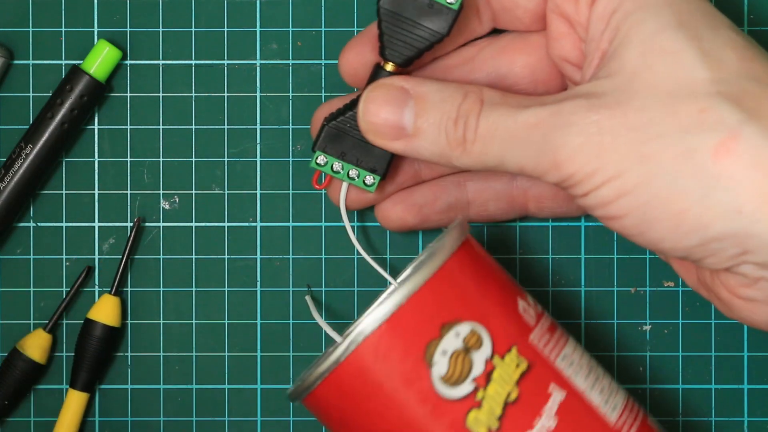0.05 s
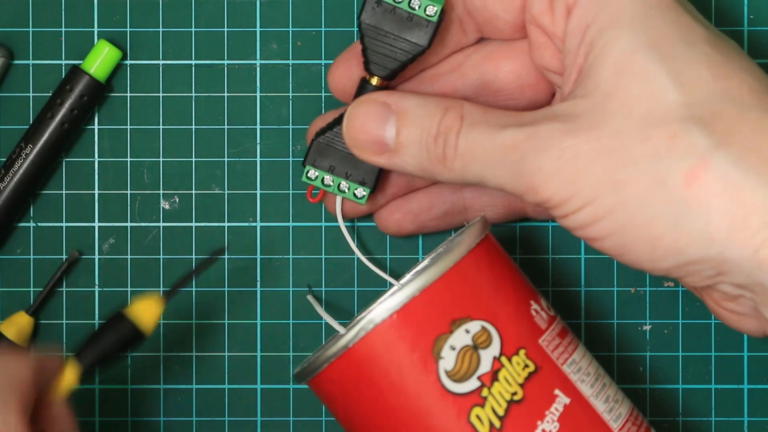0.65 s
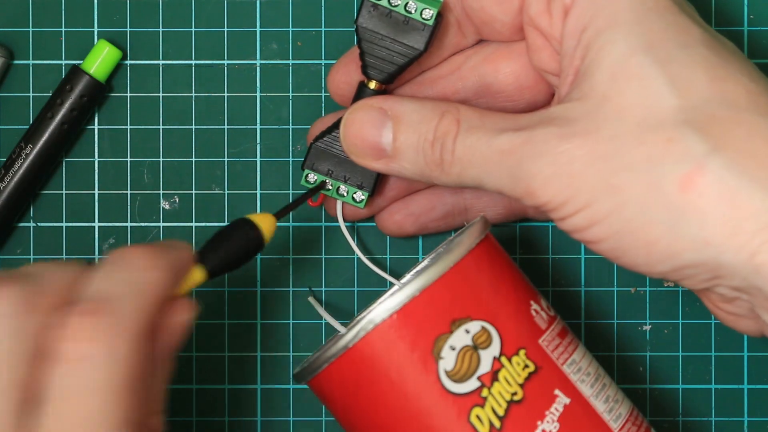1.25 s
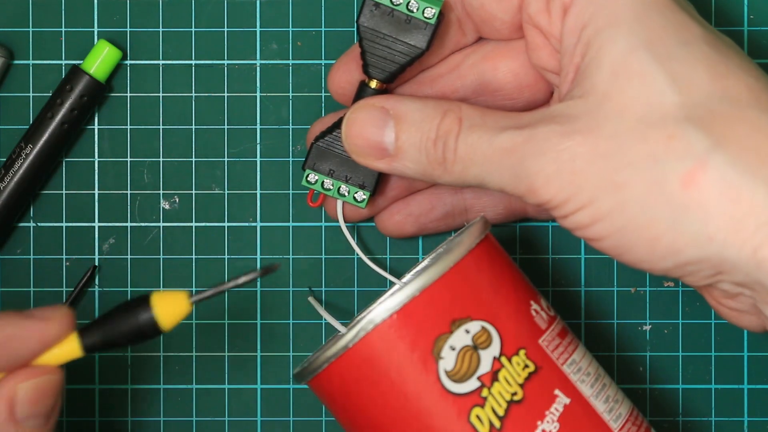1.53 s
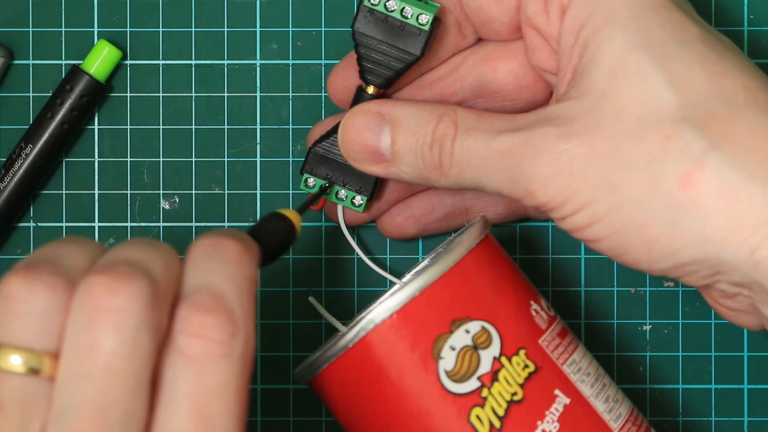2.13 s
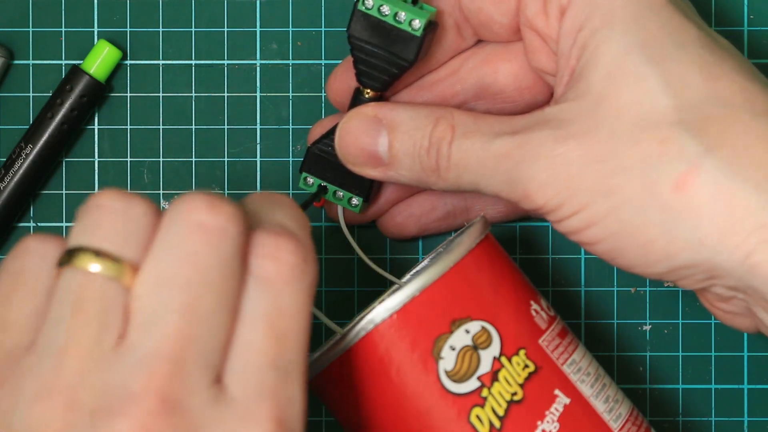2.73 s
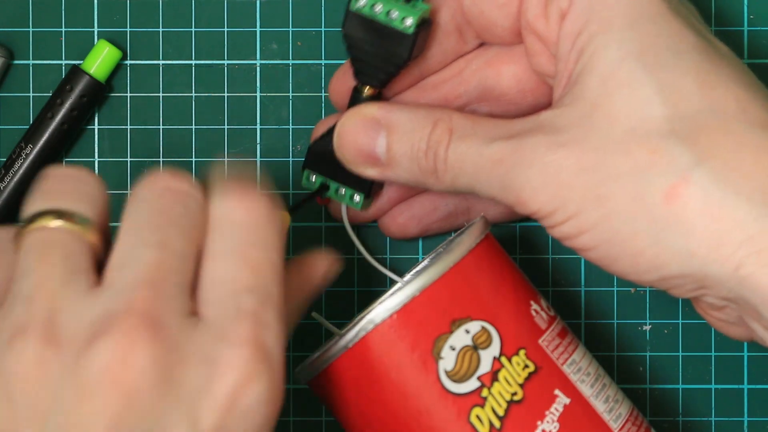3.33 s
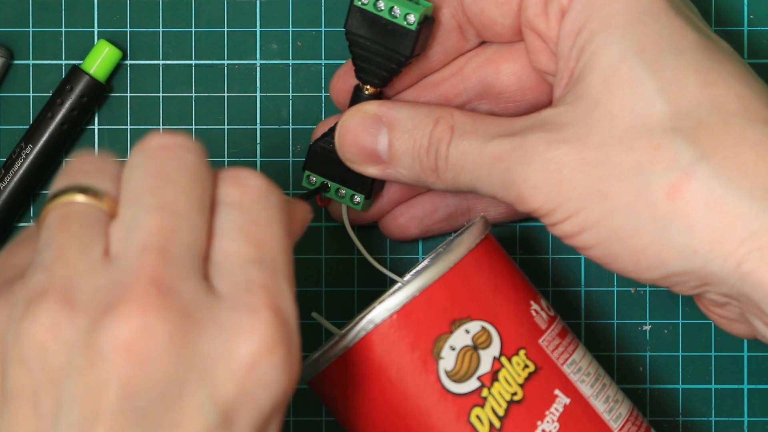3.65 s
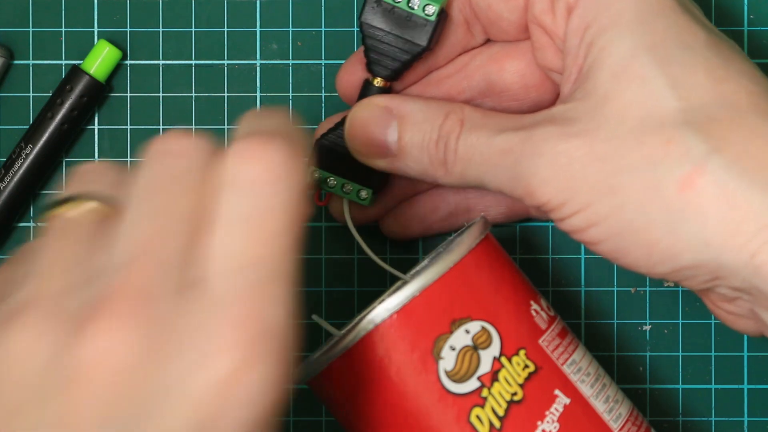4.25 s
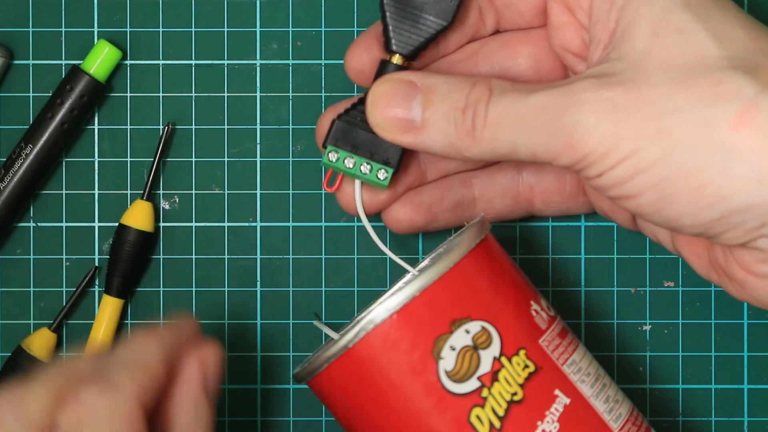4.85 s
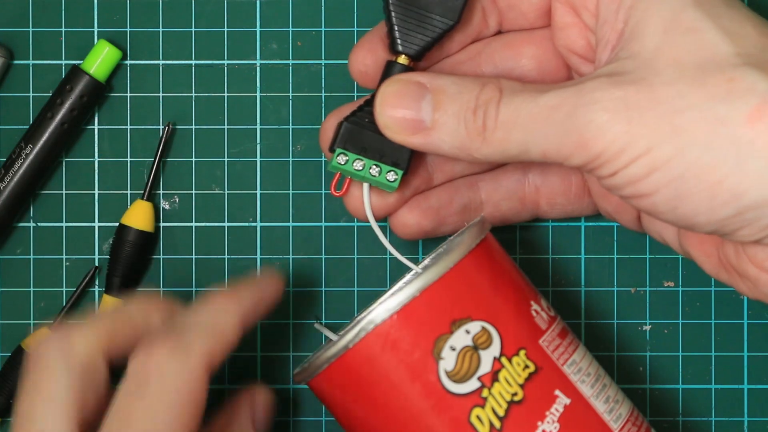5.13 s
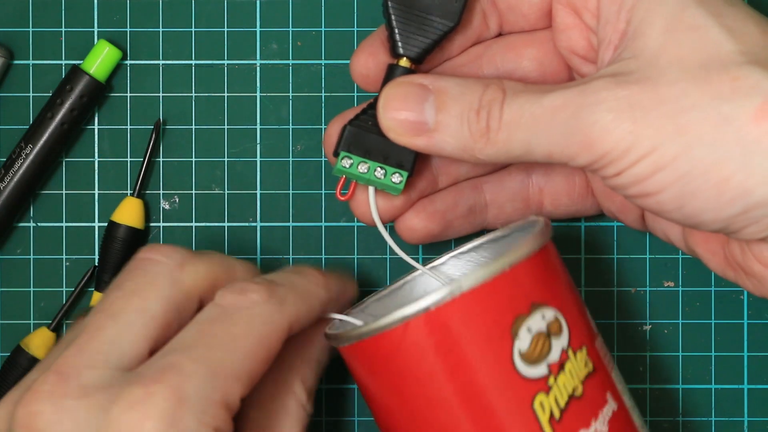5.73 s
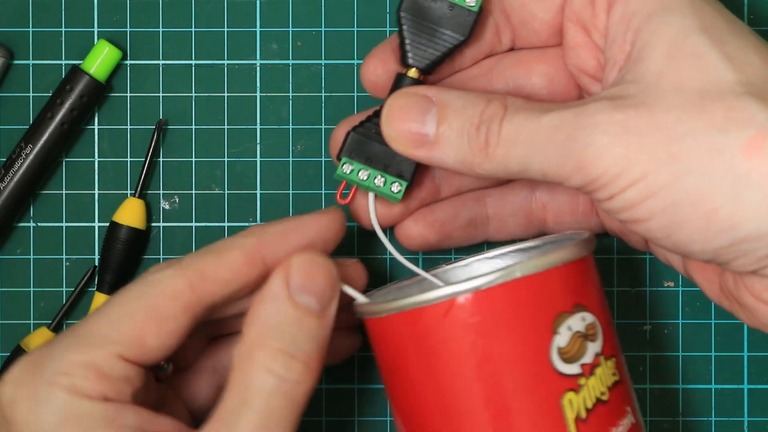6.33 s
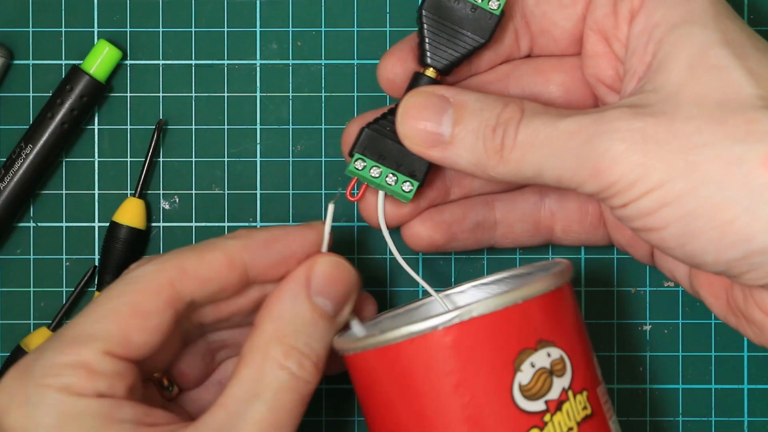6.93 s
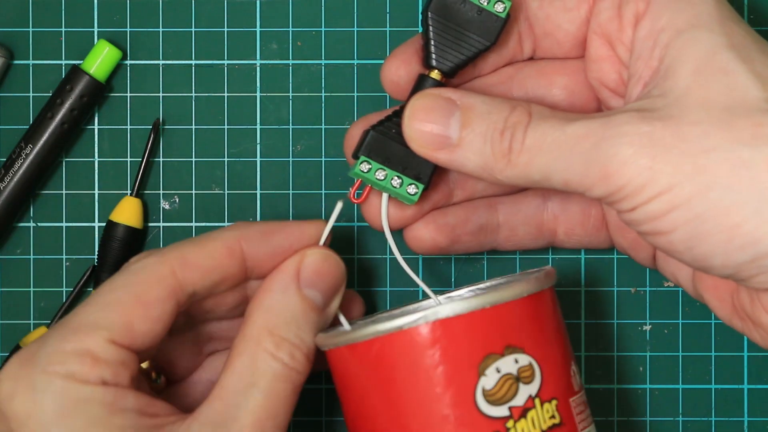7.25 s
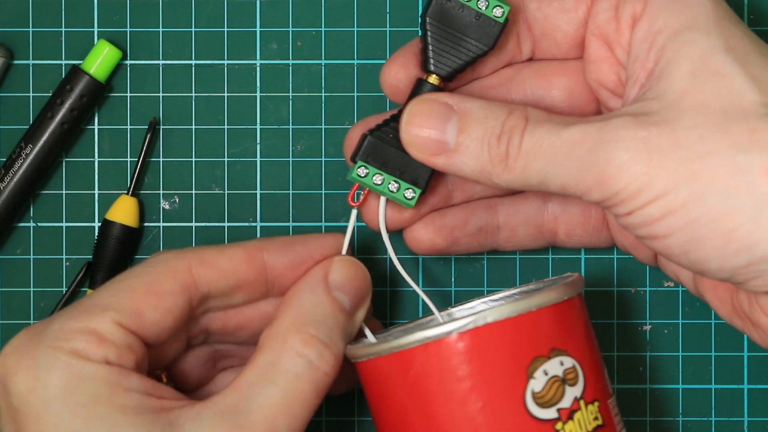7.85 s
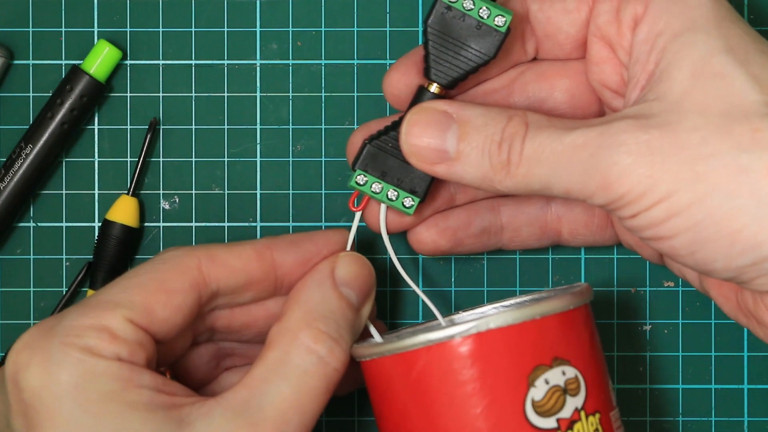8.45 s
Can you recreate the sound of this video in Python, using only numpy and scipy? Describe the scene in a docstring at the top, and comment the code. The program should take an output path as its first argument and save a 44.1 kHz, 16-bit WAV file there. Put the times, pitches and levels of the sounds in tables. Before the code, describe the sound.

A small screwdriver ticks in a connector and clatters down, then a hollow cardboard can is handled, a wire clicking on its metal rim.

```python
"""Screwdriver and cardboard can

Close up in a small quiet room, a precision screwdriver ticks in the screw terminal of a plastic
connector, then clacks and thuds onto the cutting mat. An empty cardboard can with a metal rim, brushed
at the start, is now turned in the fingers as a thin wire is pulled out: it booms hollowly, rubs and
squeaks on the mat, and the wire clicks on the rim. Impacts and friction drive damped resonances."""
import sys
import numpy as np
from scipy import signal
from scipy.fft import rfft, irfft
from scipy.io import wavfile
from scipy.ndimage import uniform_filter1d

SR = 44100
rng = np.random.default_rng(int(sys.argv[2]) if len(sys.argv) > 2 else 0)


def inscribe(sig):
    """Save sig as 16-bit PCM at rate SR to the path in sys.argv[1].

    A 1-D sig is mono; a 2-D sig holds one channel per row.
    Samples are clipped to [-1, 1] before scaling.
    """
    pcm = np.round(np.clip(np.atleast_2d(sig).T, -1, 1) * 32767)
    wavfile.write(sys.argv[1], SR, pcm.astype(np.int16))


N = 383669
TIME = np.arange(N) / SR

# Levels in the tables are relative; an offset_db adds to the level_db of its row.
# background noise spectrum: frequency_hz, density_db
HISS_SPECTRUM = [(25, -8), (45, -16), (120, -18.5), (300, -22), (750, -24.5), (2650, -28.5), (15800, -30.5)]
# stereo width of that noise: frequency_hz, side_minus_mid_db
HISS_WIDTH = [(30, -5.5), (90, -4.5), (1300, -3.5), (8000, .5)]
# the can slides under the fingers: start_s, length_s, level_db, rumble_offset_db
CAN_SLIDES = [(0, 0.18, -60, 4), (0.189, 0.21, -63.5, 1), (0.457, 0.037, -58.5, -6), (3.3, 0.068, -61, -3),
              (5.37, 0.095, -50.5, 1.5), (5.567, .1, -45.5, -4), (5.684, .11, -58, 0),
              (5.897, .16, -55, 2.5), (6.09, 0.055, -47.5, -4), (6.213, 0.19, -49.5, -4),
              (6.585, 0.054, -54.5, -1), (6.721, 0.19, -60.5, -4.5), (7.08, 0.53, -59.5, -5.5),
              (7.624, 0.59, -69.5, 1)]
# metal scrapes along an edge: start_s, length_s, level_db
EDGE_SCRAPES = [(0, 0.041, -58.5), (0.657, .06, -65), (0.767, .025, -58.5), (3.303, 0.031, -63),
                (5.327, 0.083, -58), (5.593, .22, -48), (5.649, 0.034, -41), (5.984, 0.3, -53),
                (6.406, 0.079, -53.5), (6.49, 0.15, -61.5), (6.85, 0.04, -52)]
# the wire snaps over the metal edge: start_s, level_db, rim_offset_db
WIRE_SNAPS = [(0.004, -46, -4), (0.137, -49.5, -2), (5.348, -38.5, -3), (5.69, -27, -5),
              (5.8785, -14.5, -5.5), (5.9597, -33, 2), (5.979, -36, -15), (6.0219, -35.5, -4),
              (6.1313, -27.5, -6), (6.393, -21.5, -10), (6.464, -33.5, -8), (6.8568, -43, -9.5),
              (6.896, -30.5, -19), (7.584, -50, 1), (8.146, -52, -14)]
# fingertips land on the can: start_s, level_db, boom_offset_db
CAN_TAPS = [(0.097, -48.5, 9), (0.147, -39.5, 0.5), (0.313, -47.5, -10), (5.2913, -35, -4),
            (5.362, -44, -4), (5.4207, -35.5, -11), (5.438, -40.5, 9), (5.463, -42, 8), (5.585, -30.5, 0.5),
            (5.758, -37.5, -5.5), (5.907, -38, 2.5), (5.962, -41, 9), (6.088, -42, 2), (6.228, -42.5, -3),
            (6.247, -42, 7.5), (6.312, -39, -1), (6.464, -41, -9), (6.582, -41, -8), (6.636, -42, 4.5),
            (7.001, -46.5, -8), (7.171, -49, 7), (7.273, -45, 0), (7.381, -46.5, -1), (7.746, -47.5, -3),
            (7.783, -50, -7), (7.985, -50, -3), (8.145, -53, 2), (8.313, -59, 13)]
# modes of the can's metal edge: frequency_hz, width_hz, level_db
EDGE_MODES = [(3910, 81, -13.5), (4300, 46, 1.5), (4690, 150, 2.5), (5270, 320, -1), (6130, 280, -13),
              (6940, 320, -10.5), (7730, 730, -11), (8880, 250, -10), (9870, 280, -7.5),
              (11000, 1000, -12.5)]
# modes of its rim: frequency_hz, width_hz, level_db
RIM_MODES = [(2278, 58, 12), (2460, 81, 6), (3000, 130, -20)]
# modes of its cardboard wall: frequency_hz, width_hz, level_db
WALL_MODES = [(1324, 42, 4.5), (1417, 230, 2), (1566, 64, -4), (1730, 130, -5)]
# modes of its air, closed at one end (some near odd multiples): frequency_hz, width_hz, level_db
AIR_MODES = [(99.3, 12, -4), (140.5, 18, 3), (367, 150, -14.5), (433.8, 8.8, 7), (631, 44, -5),
             (755, 14, -8.5), (1050, 180, -18)]
# soft knocks and the can's low hollow booms: start_s, level_db, pitch_hz, width_hz
SOFT_BUMPS = [(0.003, -39.5, 148, 23.6), (0.262, -37, 106, 76), (0.265, -41, 590, 250),
              (2.961, -55, 300, 404), (3.016, -55, 200, 200), (3.114, -43.5, 107, 45),
              (3.116, -50.5, 1800, 250), (3.235, -53, 200, 216), (5.643, -43, 129, 41.67),
              (5.767, -38, 141, 21.9), (6.25, -38.5, 140, 27.78), (6.321, -39, 136, 32.41),
              (6.593, -41, 108, 37)]
# squeaks, groans and a thin ping: middle_s, half_length_s, pitch_hz, glide_per_half_octaves, level_db
SHORT_TONES = [(0.08, 0.087, 1290, 0.42, -58.5), (0.337, 0.007, 5080, -0.013, -44),
               (0.687, 0.061, 4190, -0.069, -62), (0.962, 0.078, 263.7, 0.027, -61),
               (5.347, .014, 642, -0.14, -51), (5.424, 0.017, 4570, 0.13, -43),
               (5.567, 0.02, 630, 0.082, -48.5), (5.652, .02, 1677, -0.023, -34.5),
               (5.668, .018, 1670, 0, -32), (5.684, 0.033, 1680, -0.13, -41)]
# the blade slips in the terminal: start_s, level_db, pitch_hz, housing_offset_db
BLADE_SLIPS = [(0.7831, -49, 7270, -1), (2.0084, -50, 6840, 7), (2.265, -64, 4000, 14.5),
               (2.4758, -52, 12000, 8), (2.599, -56, 8950, -1), (2.685, -44, 10550, -18),
               (2.812, -35.5, 8860, -28), (3.1164, -57.5, 5040, 6), (3.321, -52, 4270, -4),
               (3.4532, -46.5, 10400, -4.5), (4.044, -46.5, 5670, -3.5), (4.045, -48.5, 9000, -20),
               (4.363, -59.5, 4240, 10.5)]
# response of the plastic housing: frequency_hz, density_db
HOUSING_SPECTRUM = [(500, -42), (1200, 7), (1900, 9), (3000, 8.5), (7000, 0.5), (12000, -5), (16000, -10)]
# modes of the steel shaft: frequency_hz, width_hz, level_db
SHAFT_MODES = [(3130, 22, -9), (3970, 45, -4.5), (5660, 56, -4.5), (7400, 50, 0), (9200, 49, 5),
               (10450, 43, -0.5), (11500, 62, -2)]
# the screwdriver lands, tip first, then handle: start_s, clack_db, thud_db
TOOL_LANDINGS = [(4.5841, -35.5, -43), (4.5868, -15, -46.5), (4.588, -16, -25), (4.669, -35, -49),
                 (4.711, -42.5, -60.5), (4.724, -41.5, -55), (4.741, -41.5, -26.5), (4.7438, -25.5, -12),
                 (4.7549, -9, -20.5), (4.7573, -15.5, -15), (4.7665, -29.5, -19.5), (4.787, -37, -20.5),
                 (4.795, -27, -45)]
# hard clack of the shaft: frequency_hz, density_db
CLACK_SPECTRUM = [(100, -18.5), (230, -11.5), (320, -14.5), (420, -7.5), (650, -3), (1000, -17), (1800, 2),
                  (2400, -4.5), (2700, -5), (3100, 6), (3430, -16.5), (3750, 3), (5500, -6.5), (9300, -5.5),
                  (11500, -10), (12500, -18.5), (15500, -22)]
# dull thud of the handle: frequency_hz, density_db
THUD_SPECTRUM = [(90, -29.5), (300, -33.5), (520, -23.5), (690, -0.5), (850, -10), (1250, -4), (1900, -7.5),
                 (2400, -5.5), (3000, -35.5), (6000, -26.5), (15000, -57.5)]
# modes of the handle: frequency_hz, width_hz, level_db
HANDLE_MODES = [(669.5, 19, 0.5), (1080, 18, 2), (1230, 20, -3), (1340, 20, -3), (1415, 24, -3.5),
                (1585, 26, -4), (1745, 26, -5.5), (2413, 24, 5)]
# reverberation time: frequency_hz, t60_s
ROOM_DECAY = [(100, 0.44), (500, 0.28), (1500, 0.29), (4000, 0.33), (9000, 0.38), (15000, .22)]
# reverberation against the direct sound: frequency_hz, level_db
ROOM_GAIN = [(100, -1), (500, -2.5), (1500, -6), (4000, -5.5), (9000, -7.5), (15000, -7.5)]

HISS_DB, CUTOFF_HZ = -64, 15900


def from_db(db):
    """Amplitude grows tenfold every 20 decibels."""
    return 10 ** (np.asarray(db) / 20)


def at_hz(points, hz):
    """Interpolation on a log-frequency axis."""
    frequencies, values = np.transpose(points)
    return np.interp(np.log(np.maximum(hz, 1)), np.log(frequencies), values)


def unit_energy(x):
    """Normalisation: a response of unit energy preserves the power of white noise."""
    return x / np.sqrt(np.sum(x ** 2) + 1e-20)


def through(x, response):
    """A linear system convolves its input with its impulse response."""
    return signal.oaconvolve(x, response)[:N]


def butterworth(x, order, hz, kind="band"):
    """Filtering with a maximally flat passband."""
    return signal.sosfilt(signal.butter(order, hz, kind, fs=SR, output="sos"), x)


def add(out, start_s, sound):
    """Superposition: a short sound adds to what is already there."""
    start = max(0, int(start_s * SR))
    out[start:start + len(sound)] += sound[:max(0, N - start)]


def modes(rows):
    """Modal ringing: the wider a resonance, the faster its sinusoid decays."""
    t = TIME[:8192]
    return unit_energy(sum(from_db(db) * width * np.exp(-np.pi * width * t) * np.cos(2 * np.pi * hz * t)
                           for hz, width, db in rows))


def damped_body(spectrum, size=2048):
    """Minimum phase: a magnitude spectrum determines a compact causal response."""
    magnitude = from_db(at_hz(spectrum, np.fft.rfftfreq(size, 1 / SR)))
    cepstrum = irfft(np.log(magnitude))
    causal = np.r_[cepstrum[0], 2 * cepstrum[1:size // 2]]
    return unit_energy(irfft(np.exp(rfft(causal, size))))


def contact(length_s):
    """Broadband excitation: milliseconds of micro-impacts and bench reflections."""
    t = TIME[:2048] / length_s
    envelope = np.exp(-t ** 2) * (1 - np.exp(-t / 0.22))
    burst = rng.standard_normal(len(t)) * envelope
    for _ in range(8):   # flatten the spectrum, then confine the burst again
        burst = irfft(np.exp(1j * np.angle(rfft(burst)))) * np.sqrt(envelope)
    return unit_energy(burst)


def blows(starts_s, levels_db, length_s):
    """Contact forces superpose; they share one length or have one each."""
    force = np.zeros(N)
    for start_s, db, contact_s in np.broadcast(starts_s, levels_db, length_s):
        add(force, start_s, from_db(db) * contact(contact_s))
    return force


def hiss():
    """Stationary noise: a steady background of air and hiss, as mid and side."""
    hz = np.fft.rfftfreq(N, 1 / SR)
    colour = from_db(at_hz(HISS_SPECTRUM, hz))
    colour = colour * from_db(HISS_DB) / np.sqrt(np.mean(colour ** 2 * (hz < CUTOFF_HZ)))
    mid, side = rfft(rng.standard_normal((2, N))) * colour
    return irfft(mid, N), irfft(side * from_db(at_hz(HISS_WIDTH, hz)), N)


def friction(slips_per_s, spread_db, clump_db):
    """Friction as shot noise: random slips of uneven size, clumped by a varying grip; rms 1."""
    sizes = from_db(spread_db * np.minimum(rng.exponential(1, N), 4)) * rng.choice([-1, 1], N)
    grip = np.interp(TIME, np.linspace(0, TIME[-1], 600), rng.standard_normal(600))
    slipping = rng.random(N) < slips_per_s / SR
    return unit_energy(sizes * from_db(clump_db * grip) * slipping) * np.sqrt(N)


def strokes(starts_s, lengths_s, levels_db, attack_s=0.02, release_db_per_s=330):
    """Rubbing pressure rises linearly, holds and decays exponentially."""
    pressure = np.zeros(N)
    for start_s, length_s, db in zip(starts_s, lengths_s, levels_db):
        t = TIME[:int(length_s * SR) + SR // 2]
        fall_db = release_db_per_s * np.maximum(t - length_s, 0)
        add(pressure, start_s, np.minimum(t / attack_s, 1) * from_db(db - fall_db))
    return pressure


def rubbing_forces():
    """Sliding friction: slides rustle and rumble in the can, scrapes crackle on edge and rim."""
    start_s, length_s, db, rumble_offset_db = np.transpose(CAN_SLIDES)
    rustle = strokes(start_s, length_s, db) * friction(slips_per_s=1400, spread_db=-0.5, clump_db=4.5)
    rumble = strokes(start_s, length_s, db + rumble_offset_db)
    rumble *= friction(slips_per_s=1000, spread_db=2.5, clump_db=1.5)
    scrape = strokes(*np.transpose(EDGE_SCRAPES)) * friction(slips_per_s=1400, spread_db=0.5, clump_db=4)
    edge = from_db(-4) * scrape + from_db(-16) * rustle
    rim = from_db(-13) * scrape + from_db(-15) * rustle
    wall, air = from_db(-7.5) * rustle, from_db(-5) * rumble
    return np.array([edge, rim, wall, air])


def wire_forces(gain_db=14, skid_s=0.0061, skid_db=-16):
    """Impulsive excitation: the wire skids and snaps over the edge; the rim couples to wall and air."""
    start_s, db, rim_offset_db = np.transpose(WIRE_SNAPS)
    snap = blows(start_s, db + gain_db, length_s=0.006)
    skid = blows(start_s - skid_s, db + gain_db + skid_db, length_s=2 * skid_s)
    rim = blows(start_s, db + gain_db + rim_offset_db, length_s=0.0043)
    wall, air = from_db(-13) * rim, from_db(-22) * rim
    return np.array([snap + skid, rim, wall, air])


def tap_forces(gain_db=14, boom_gain_db=13, firm_db=-34.5, firm_s=0.0055, drag_s_per_db=0.18):
    """Soft impact: a firm fingertip is brief and excites the metal, a light one is dull and drags."""
    start_s, db, boom_offset_db = np.transpose(CAN_TAPS)
    lightness_db = np.maximum(firm_db - db, 0)
    contact_s = np.minimum(firm_s + drag_s_per_db * lightness_db, 0.017)
    start_s = start_s - 0.299 * (contact_s - firm_s)   # a soft fingertip starts to press sooner
    metal = blows(start_s, db + gain_db - 0.85 * lightness_db, contact_s)
    edge, rim = from_db(-10.5) * metal, from_db(-3) * metal
    wall = blows(start_s, db + gain_db, contact_s)
    air = blows(start_s, db + boom_offset_db + boom_gain_db, contact_s)
    return np.array([edge, rim, wall, air])


def can():
    """Forced vibration: wire, taps and rubbing drive the same edge, rim, wall and air column."""
    on_edge, on_rim, on_wall, on_air = wire_forces() + tap_forces() + rubbing_forces()
    edge = through(on_edge, modes(EDGE_MODES))
    shell = through(on_rim, modes(RIM_MODES)) + through(on_wall, modes(WALL_MODES))
    hollow = through(on_air, modes(AIR_MODES))
    # small parts radiate no bass; soft fingers put little treble into the large ones
    return (butterworth(edge, 2, [1800, 11500]) + butterworth(shell, 1, [700, 4500])
            + butterworth(hollow, 2, [70, 1300]))


def soft_bumps(gain_db=14):
    """Damped oscillation: soft knocks and the can's low hollow booms, each one decaying note."""
    out = np.zeros(N)
    for start_s, db, hz, width_hz in SOFT_BUMPS:
        note = signal.fftconvolve(contact(length_s=0.0022), modes([(hz, width_hz, 0)]))
        softened = butterworth(note, 1, [hz / 2, hz * 2])
        add(out, start_s, from_db(db + gain_db) * unit_energy(softened))
    return out


def short_tones(jitter=0.035, overtone_db=-24, gain_db=2):
    """Frequency modulation: wavering squeaks and groans of can and fingers, and a thin screw ping."""
    out = np.zeros(N)
    for middle_s, half_s, hz, glide_octaves, db in SHORT_TONES:
        n = int(2 * half_s * SR)
        waver = uniform_filter1d(rng.standard_normal(N // 20), size=40)[:n]
        pitch_hz = hz * 2 ** (glide_octaves * np.linspace(-1, 1, n)) * (1 + jitter * waver / waver.std())
        phase = 2 * np.pi * np.cumsum(pitch_hz) / SR
        tone = np.sin(phase) + from_db(overtone_db) * np.sin(2 * phase)
        add(out, middle_s - half_s, from_db(db + gain_db) * np.hanning(n) ** 4 * tone)
    return out


def screw_terminal(ping_gain_db=12, housing_gain_db=13, band_ratio=7 / 6, ring_width_hz=110):
    """Resonance: each slip of the blade pings the metal, rings the shaft and clicks the plastic."""
    out, housing, shaft = np.zeros(N), damped_body(HOUSING_SPECTRUM), modes(SHAFT_MODES)
    for start_s, db, hz, housing_offset_db in BLADE_SLIPS:
        force = contact(length_s=0.004)
        ping = unit_energy(butterworth(force, 2, [hz / band_ratio, hz * band_ratio]))
        pitched_ring = unit_energy(signal.fftconvolve(ping, modes([(hz, ring_width_hz, 0)])))
        shaft_ring = unit_energy(signal.fftconvolve(ping, shaft))
        for metal, relative_db in (ping, 0), (pitched_ring, -4), (shaft_ring, -10):
            add(out, start_s, from_db(db + ping_gain_db + relative_db) * metal)
        click = signal.fftconvolve(force, housing)
        add(out, start_s, from_db(db + housing_gain_db + housing_offset_db) * click)
    return out


def screwdriver_landing(clack_gain_db=14, thud_gain_db=13.5, ring_db=-15, rattle_db=-8):
    """Impact and free vibration: the hard shaft clacks and rings, the rubbery handle thuds and rattles."""
    start_s, clack_db, thud_db = np.transpose(TOOL_LANDINGS)
    on_shaft = blows(start_s, clack_db + clack_gain_db, length_s=0.0057)
    on_handle = blows(start_s, thud_db + thud_gain_db, length_s=0.0035)
    clack = through(on_shaft, damped_body(CLACK_SPECTRUM))
    ring = from_db(ring_db) * through(on_shaft, modes(SHAFT_MODES))
    thud = through(on_handle, damped_body(THUD_SPECTRUM))
    rattle = from_db(rattle_db) * through(on_handle, modes(HANDLE_MODES))
    # a tool this small moves no air in the deep bass
    return butterworth(clack + ring + thud + rattle, 2, 70, "high")


def room_tail(build_up_s=0.00096, size=22050, bands=10):
    """Reverberation: diffuse reflections build up quickly and decay exponentially, band by band."""
    t, hz = TIME[:size], np.fft.rfftfreq(size, 1 / SR)
    # noise made even in spectrum, then in time, so that no room mode stands out
    noise = rng.standard_normal(size) * from_db(-60 * t / at_hz(ROOM_DECAY, 1000))
    even = irfft(np.exp(1j * np.angle(rfft(noise))), size)
    white = rfft(even / np.sqrt(uniform_filter1d(even ** 2, size=512) + 1e-20))
    centres_hz, tail = np.geomspace(80, 16000, bands), 0
    onset = 1 - np.exp(-(t / build_up_s) ** 2)
    for centre_hz, share in zip(centres_hz, np.eye(bands)):
        band = irfft(white * at_hz(np.c_[centres_hz, share], hz), size)
        envelope = onset * from_db(-60 * t / at_hz(ROOM_DECAY, centre_hz))
        tail = tail + band * unit_energy(envelope) * from_db(at_hz(ROOM_GAIN, centre_hz))
    return tail


def scene(room_side_db=-22):
    """Mid-side stereo: the sources lie straight ahead; only the room and the hiss have width."""
    direct = screw_terminal() + screwdriver_landing() + can() + short_tones() + soft_bumps()
    hiss_mid, hiss_side = hiss()
    mid = direct + through(direct, room_tail()) + hiss_mid
    side = from_db(room_side_db) * through(direct, room_tail()) + hiss_side
    return np.array([mid + side, mid - side])


def record(dry):
    """Band limiting: an elliptic low-pass cuts the highest treble steeply."""
    return signal.sosfilt(signal.ellip(12, 0.1, 80, CUTOFF_HZ, fs=SR, output="sos"), dry)


dry = scene()
out = record(dry)
inscribe(out)
```